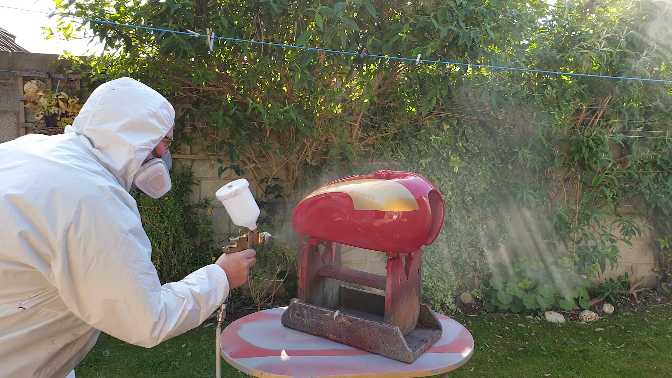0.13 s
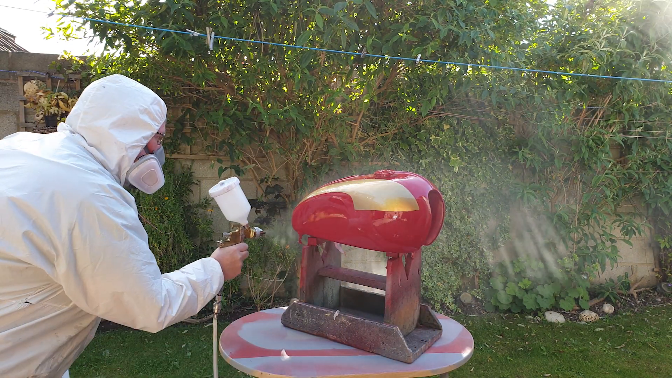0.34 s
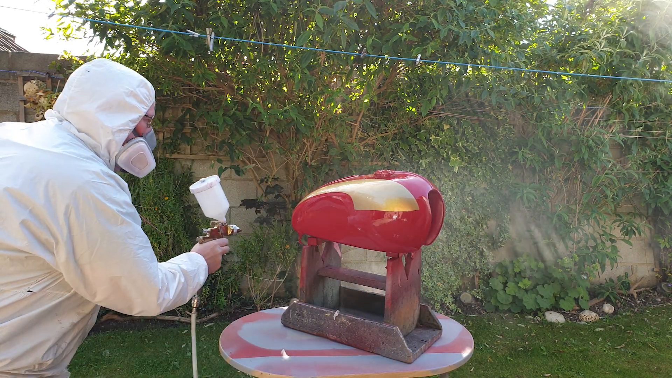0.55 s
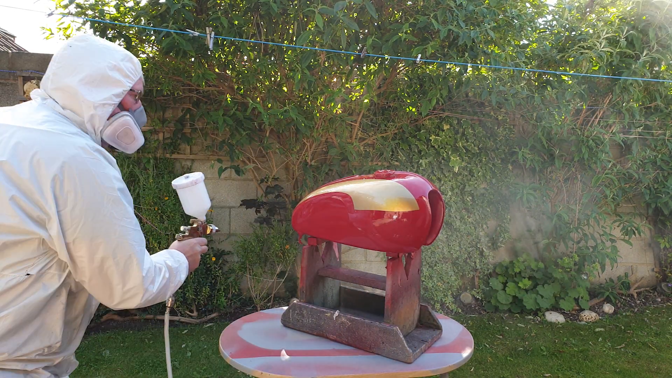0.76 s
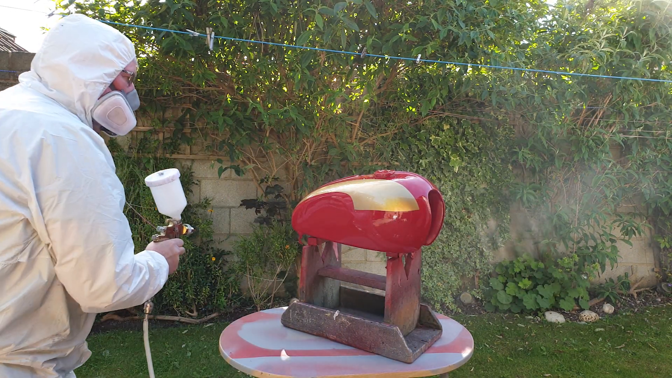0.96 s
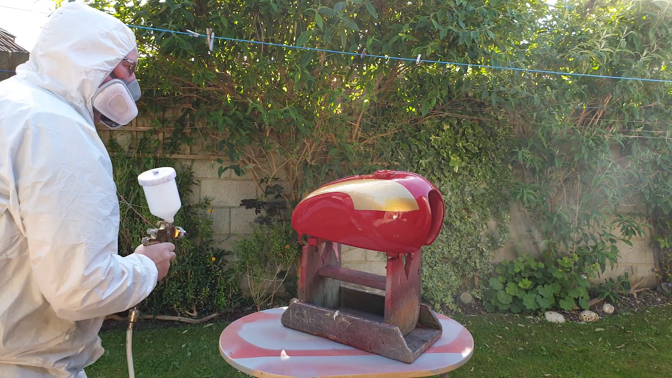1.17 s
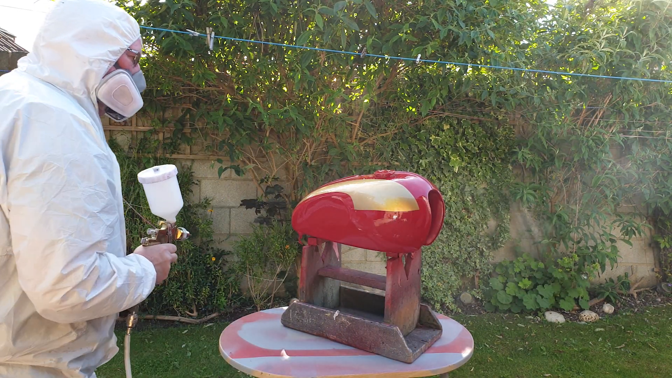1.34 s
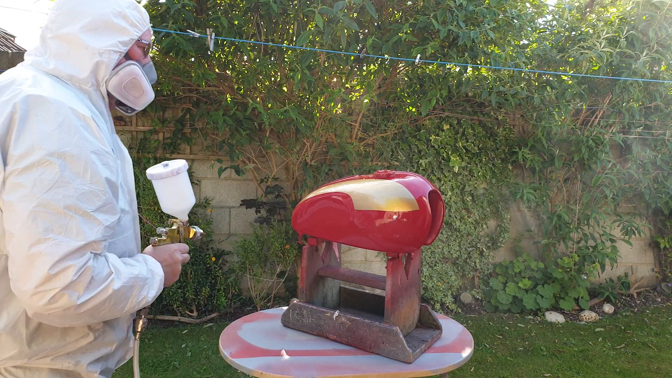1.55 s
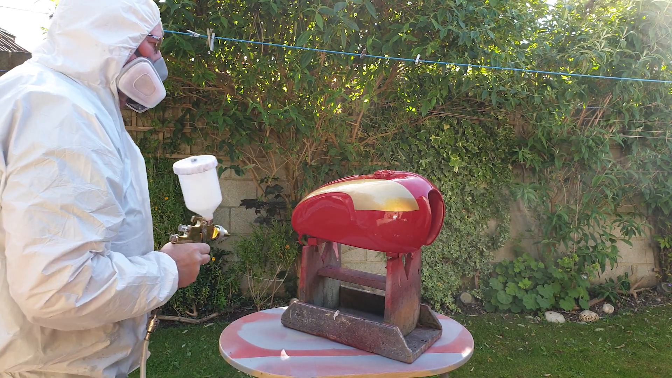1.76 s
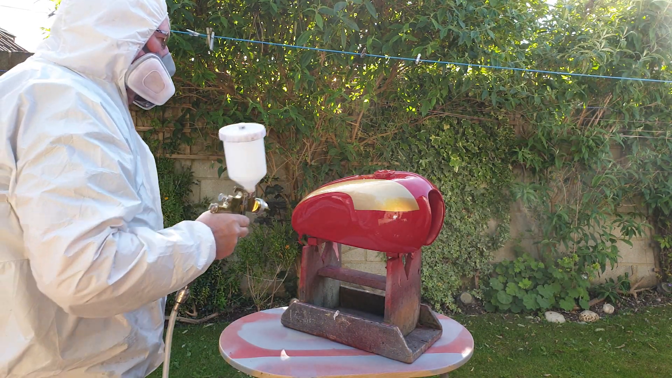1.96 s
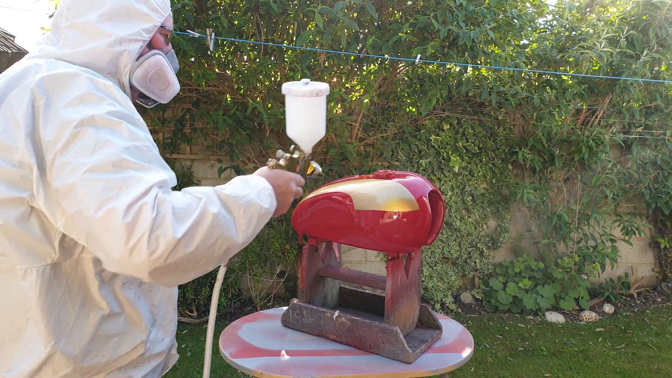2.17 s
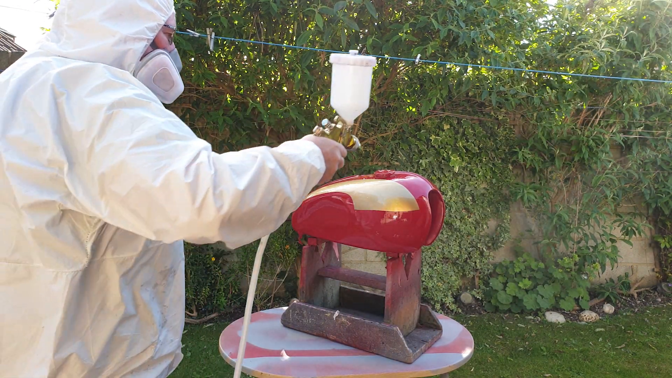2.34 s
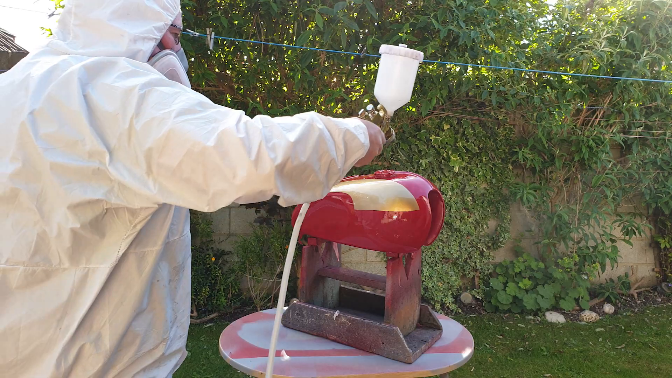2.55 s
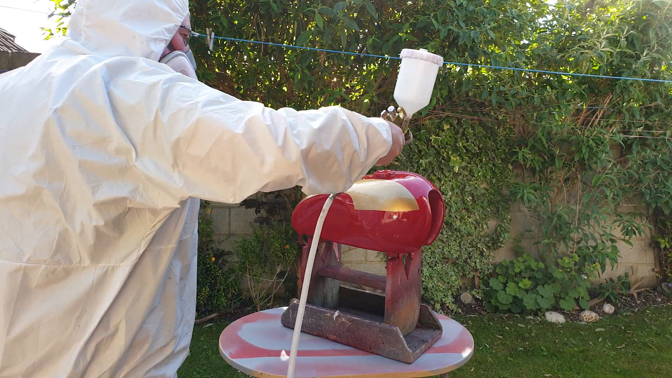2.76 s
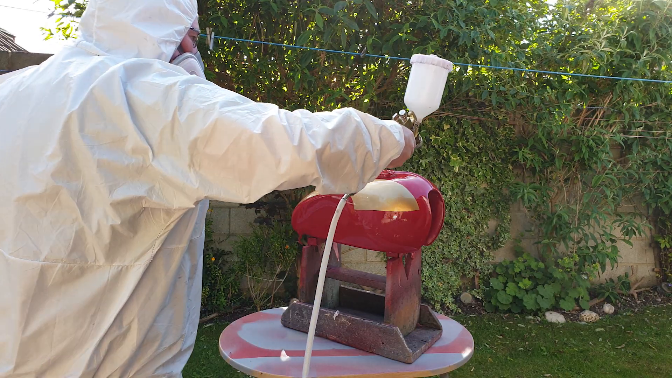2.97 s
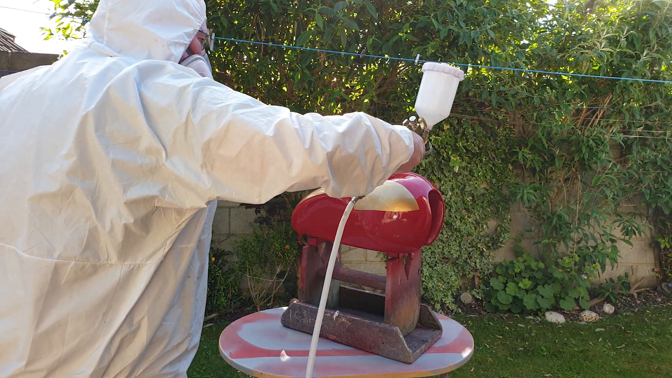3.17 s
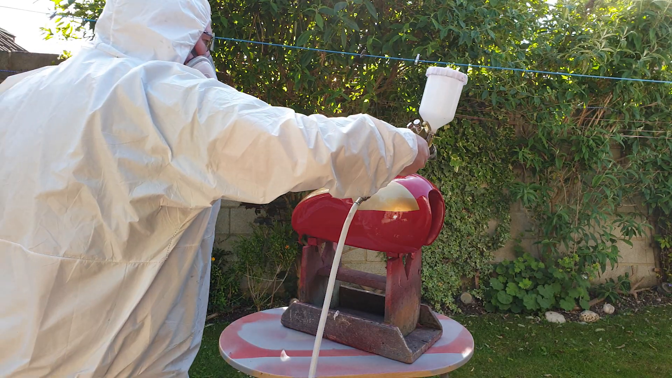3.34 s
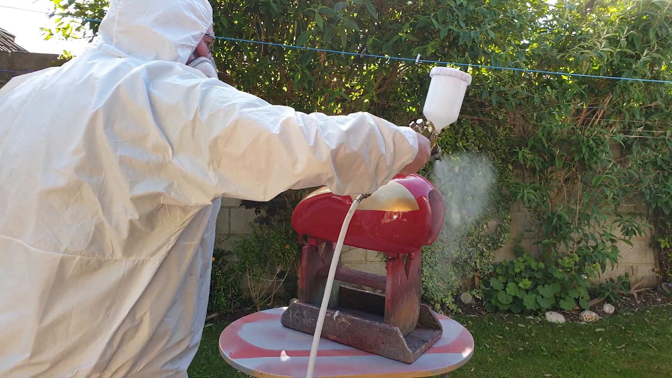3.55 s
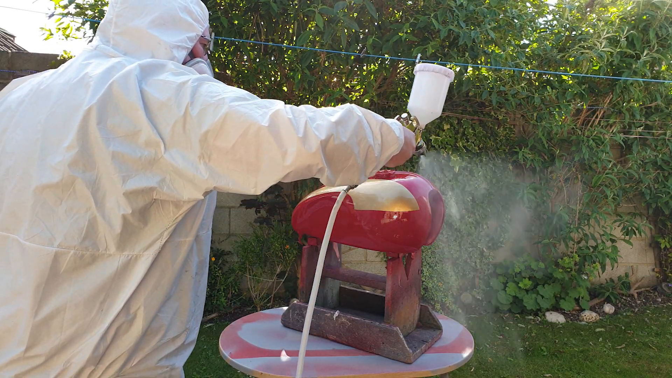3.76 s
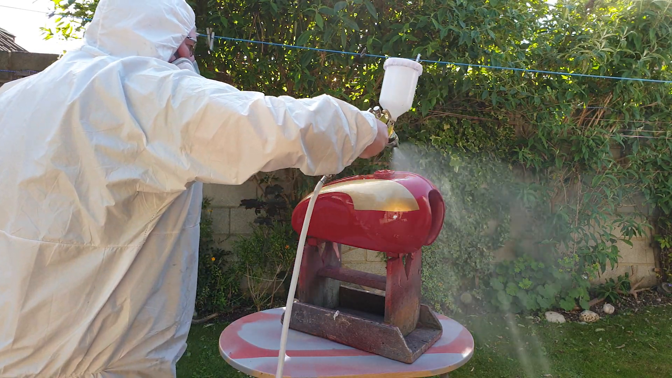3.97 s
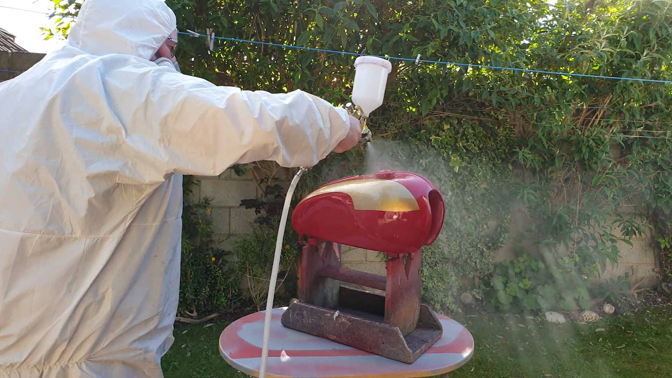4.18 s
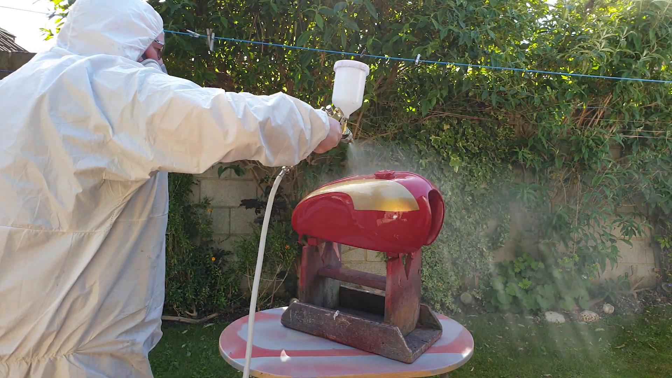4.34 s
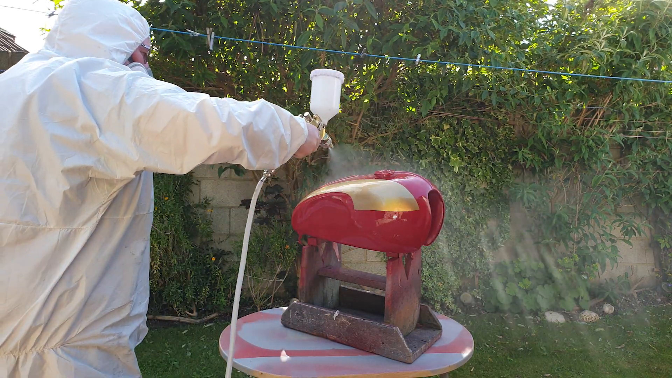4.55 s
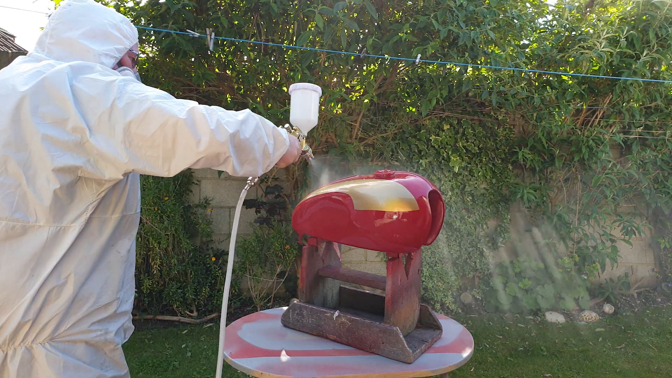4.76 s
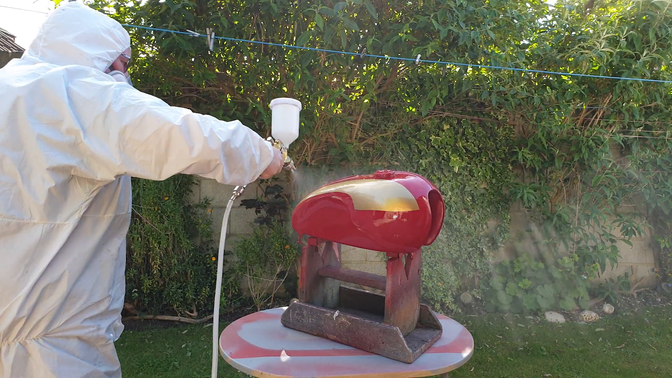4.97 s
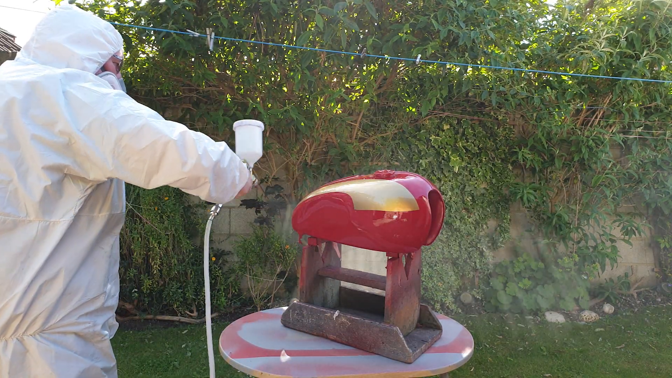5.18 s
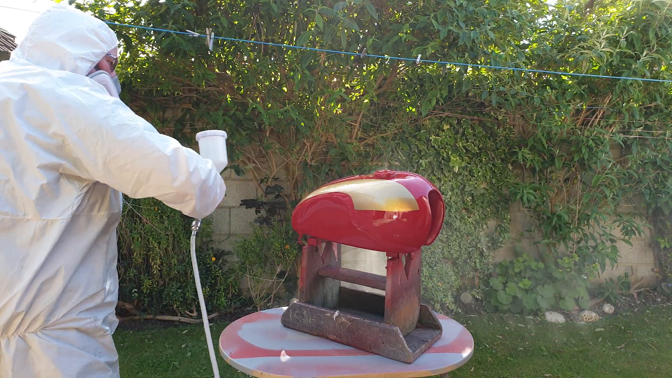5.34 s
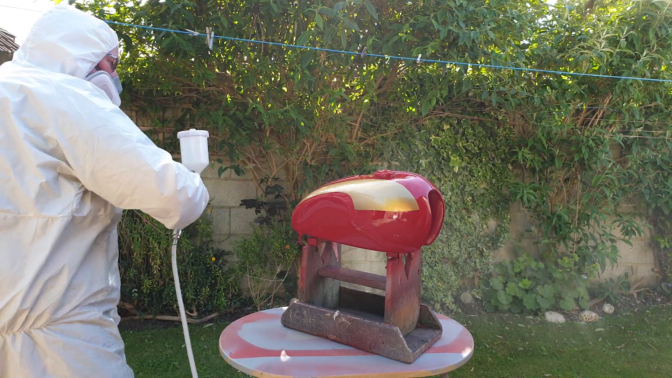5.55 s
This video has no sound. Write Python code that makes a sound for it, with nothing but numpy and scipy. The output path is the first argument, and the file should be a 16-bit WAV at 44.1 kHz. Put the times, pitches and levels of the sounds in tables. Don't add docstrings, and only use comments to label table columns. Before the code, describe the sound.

A compressed-air spray gun hisses brightly in a garden, shuts off into a faint leaking hiss, then bursts open again for a second long pass.

```python
import sys
import numpy as np
from scipy import signal
from scipy.fft import rfft, irfft, next_fast_len
from scipy.io import wavfile
from scipy.ndimage import map_coordinates

SR = 44100
rng = np.random.default_rng(int(sys.argv[2]) if len(sys.argv) > 2 else 0)


def volts(x):
    e = np.asarray(x, float) / 20
    return 10 ** e


def log_audio(samples):
    frames = np.atleast_2d(samples).T
    limited = np.clip(frames, -1, 1)
    pcm = np.round(limited * 32767).astype(np.int16)
    wavfile.write(sys.argv[1], SR, pcm)


N = 247401
T = np.arange(N) / SR

# f/Hz, density/dB per Hz
FAR_LEFT = [(30, -93), (55, -69), (90, -74.5), (115, -77), (150, -75), (220, -73.5), (310, -83.5),
            (420, -76.5), (520, -82), (700, -87.5), (1000, -89), (1400, -98), (1800, -100.5)]
FAR_RIGHT = [(30, -91), (55, -72), (90, -76.5), (115, -85.5), (150, -77), (220, -78), (310, -86),
             (420, -85), (520, -92), (700, -101.1), (1000, -103.3), (1400, -108.2), (1800, -109.9)]
# f/Hz, share/1
FAR_COMMON = [(60, 0.96), (150, 0.92), (300, 0.61), (700, 0.39), (1500, 0.039)]
# middle t/s, length/s, rise/dB
GUSTS = [
    (0.65, 0.064, 3),
    (2.25, 0.057, 3),
    (2.85, .12, 5),
    (3.7, 0.62, 7.5),
    (4.3, .1, 4),
    (4.9, 0.13, 3.5),
]
# middle t/s, length/s, rise/dB
VEHICLES = [
    (0.25, 0.34, 2.7),
    (3.1, 0.49, 4.2),
]
# f/Hz, density/dB per Hz
LEAVES_LEFT = [(900, -6), (1600, -14), (2500, -0.5), (4000, 1.5), (5200, 2.5), (7500, 4.5), (10000, -1),
               (16000, -26)]
LEAVES_RIGHT = [(900, -28), (1600, -49), (2500, -38), (4000, -53), (5200, -12), (7500, -21), (10000, -12),
                (16000, -40)]
# middle t/s, length/s, rise/dB
STIRS = [
    (1.14, 0.34, 17),
    (2.11, 0.1, 18),
    (3.5, 0.065, 7.6),
    (5.39, 0.055, 12),
    (5.62, 0.085, 27),
    (0.61, .06, 12),
]
# t/s, peak level/dB, left minus right/dB, f/Hz, sharp share/1
PUFFS = [
    (.565, -37.5, 5, 80, .1),
    (2.882, -40, -19, 60.5, .05),
    (2.99, -30.5, -29, 68, .05),
    (3.194, -31.5, -21, 62, .05),
    (3.320, -39, 2, 52, .05),
    (3.5228, -15.5, -32, 71.5, 1),
    (3.523, -33, -5.5, 194, .05),
    (3.937, -34.5, -14, 67.5, .1),
    (5.313, -32, 22, 62, 0.49),
]
# t/s, peak level/dB, f/Hz
TICKS = [
    (1.095, -47, 2600),
    (1.19, -43, 1600),
]
# f/Hz, width/Hz, level/dB, start t/s, end t/s
WHISTLES = [(4230, 71, -65.5, 0.54, 0.91), (2980, 85, -68, 0.51, 0.9), (2310, 180, -69, 2.6, 3.8),
            (3700, 70, -70, 0.6, 0.79), (3040, 250, -70, 4.9, 5.6), (5200, 1600, -63, 5.32, 5.5),
            (12150, 600, -50.5, 1.64, 2.1), (6350, 250, -62, 1.53, 1.9), (2630, 220, -69, 2, 3),
            (10900, 830, -51.5, 0.86, 1.7), (13000, 500, -58, 1.85, 2.15), (457, 130, -58.5, 2.83, 3.54)]
# t/s, bearing/degrees
BEARING = [(0.05, -6.5), (0.48, -12.5), (0.8, -21), (1.1, -13.5), (1.5, -35), (1.95, -44), (2.4, -6),
           (2.7, -4.5), (3.46, 0), (3.67, 14.5), (4.25, 8.5), (4.5, -0.5), (5.2, -10.5), (5.5, -32),
           (5.6, -11)]
# f/Hz, density/dB per Hz
LEAK_LEFT = [(1600, -108), (2250, -88), (2700, -79), (3300, -91.5), (4300, -100), (5300, -86), (6000, -80),
             (7300, -84.5), (8500, -78.5), (10500, -75), (12000, -75), (14000, -82.5), (15000, -79.5),
             (15900, -81)]
LEAK_RIGHT = [(1600, -109.6), (2700, -99), (3700, -109.0), (4800, -101.4), (6000, -86.5), (7300, -109),
              (8500, -88.5), (9500, -81), (10500, -76.5), (12000, -80.5), (13000, -80), (14000, -86),
              (15000, -95.9), (15700, -103.8)]
# f/Hz, share/1
LEAK_COMMON = [(1600, .15), (2700, 0.45), (7000, 0.19), (11000, 0.33), (15000, .15)]
# t/s, level/dB, facing the microphone/dB
LEAK_COURSE = [(0.68, -62, 3), (0.8, -58, 0), (1.05, -53, 0), (1.2, -50.5, 0.4), (1.5, -52.5, -1.5),
               (1.78, -55.5, -8), (2.08, -50, 0), (2.2, -51.5, 2), (2.4, -52, 0.2), (2.55, -52.5, 0),
               (2.7, -47.5, 4), (2.95, -48, 2.5), (3.28, -44, 6), (3.46, -47, 3), (5.43, -50.5, 5),
               (5.5, -50, 1.2), (5.6, -48.5, 2.5)]
# middle t/s, length/s, change/dB
SHADED = [
    (1.15, 0.31, -8),
    (2.35, 0.14, -1.5),
]
# f/Hz, density/dB per Hz
JET_LEFT = [(500, -83.5), (1000, -75.5), (2000, -73.5), (3500, -72.5), (5500, -70.5), (7000, -67.5),
            (8000, -60.5), (9000, -62), (10500, -61), (12000, -58.5), (13500, -60), (14500, -57.5),
            (15200, -59), (15700, -62.5)]
JET_RIGHT = [(500, -86), (1000, -83.5), (2000, -82), (3500, -80.5), (5500, -79), (7000, -79), (8000, -75),
             (9000, -66.5), (10500, -64), (12000, -61), (13500, -60), (14500, -60.5), (15200, -84),
             (15700, -86)]
# f/Hz, share/1
JET_COMMON = [(500, 0.39), (2000, 0.54), (5000, 0.56), (9000, 0.26), (15000, 0.04)]
# t/s, top level/dB
JET_TOP = [(0.12, -24.5), (0.27, -22), (0.42, -25.5), (3.67, -24.5), (4.0, -26.5), (4.2, -26), (4.5, -26),
           (4.95, -26.5), (5.12, -28)]
# opening t/s, shutting t/s
TRIGGER = [
    (-1.0, .537),
    (3.5145, 5.305),
]
# delay/ms, level/dB
ECHOES = [
    (0.699, -15),
    (1.3, -18.5),
    (2.7, -13),
    (4.702, -7),
]

PAN_DB_PER_DEG = -0.09
STEADY = np.zeros(N)


def unit_rms(x):
    return x / np.sqrt(np.mean(x ** 2) + 1e-20)


def in_time(rows):
    t, *columns = np.transpose(rows)
    return [np.interp(T, t, column) for column in columns]


def at_hz(points, hz):
    f, value = np.transpose(points)
    return np.interp(np.log(hz), np.log(f), value)


def swells(rows):
    return sum(db * np.exp(-((T - middle) / length) ** 2) for middle, length, db in rows)


def drift(rate_hz):
    r = np.exp(-80 * np.pi * rate_hz / SR)
    points = rng.standard_normal(N // 40 + 2002)
    slow = signal.lfilter([1], [1, -2 * r, r * r], points)[2000:]
    return np.interp(np.arange(N) / 40, np.arange(len(slow)), unit_rms(slow - slow.mean()))


def ring(x, hz, width_hz):
    r = np.exp(-np.pi * width_hz / SR)
    w = 2 * np.pi * hz / SR
    return signal.lfilter([0, np.sin(w)], [1, -2 * r * np.cos(w), r * r], x + 1e-18)


def sides(pan_db):
    return volts((pan_db - np.median(pan_db)) * [[0.5], [-0.5]])


def hiss(left, right, common, lag, moves, own_db, shared_db, rate):
    size = next_fast_len(N)
    hz = np.maximum(np.arange(size // 2 + 1) * SR / size, 1)
    shared, *own = rng.standard_normal((3, N))
    late = map_coordinates(shared, [np.arange(N) - lag], order=5, mode="wrap")
    share = np.clip(at_hz(common, hz), 0, 1)
    pair = np.sqrt(share) * rfft([late, shared], size) + np.sqrt(1 - share) * rfft(own, size)
    edge = hz / np.hypot(hz, left[0][0]) * np.sqrt(2)
    density_db = np.array([at_hz(left, hz), at_hz(right, hz)])
    pair = pair * volts(density_db) * np.minimum(edge, 1) ** 2
    scale = np.sqrt(np.mean(irfft(pair.mean(axis=0), size) ** 2))
    centres = [centre for centre, curve in moves]
    together = drift(rate)
    out = 0
    for k, (centre, curve_db) in enumerate(moves):
        band = np.interp(np.log(hz), np.log(centres), np.arange(len(moves)) == k)
        flicker_db = own_db * drift(rate) + shared_db * together
        gain = volts(curve_db - np.median(curve_db) + flicker_db)
        out = out + gain * irfft(pair * band, size)[:, :N]
    return out / scale


def rumble():
    passing = swells(VEHICLES)
    steep = [(4000, -125)]
    moves = [(55, swells(GUSTS)), (160, passing), (420, passing), (900, 1.63 * passing),
             (1800, -0.4 * passing)]
    noise = hiss(FAR_LEFT + steep, FAR_RIGHT + steep, FAR_COMMON, 0, moves,
                 own_db=0.46, shared_db=1.16, rate=7.9)
    return noise * volts(-52)


def leaves():
    stir, gust = swells(STIRS), swells(GUSTS)
    level_db = -61.5 + 0.28 * stir + 0.4 * gust
    low = 0.71 * stir - 0.4 * gust
    moves = [(900, STEADY), (1650, low), (2600, STEADY), (4000, STEADY), (7000, STEADY)]
    common = [(1000, 0.1), (8000, 0.11)]
    noise = hiss(LEAVES_LEFT, LEAVES_RIGHT, common, 0, moves, own_db=1.5, shared_db=-0.8, rate=7.9)
    return noise * volts(level_db)


def puffs():
    out = np.zeros((2, N))
    for start, db, pan_db, hz, sharp in PUFFS:
        t = np.clip(T - start, -0.1, 0.1)
        width_s = np.where(t < 0.006, 0.010, 0.014)
        swell = np.exp(-((t - 0.006) / width_s) ** 2)
        body = swell * np.cos(2 * np.pi * hz * t * (1 - 8.6 * t))
        crest = sharp * np.exp(-np.abs(t - 0.0015) / 0.0006)
        out += volts(db + np.minimum([[pan_db], [-pan_db]], 0)) * (body + crest)
    return out


def fittings():
    out = np.zeros(N)
    for t, db, hz in TICKS:
        click = volts(db) * (np.arange(N) == round(t * SR))
        out += ring(click, hz, width_hz=400)
    for hz, width_hz, db, start, end in WHISTLES:
        window = np.sin(np.pi * np.clip((T - start) / (end - start), 0, 1))
        once = ring(rng.standard_normal(N), hz, 0.67 * width_hz)
        tone = unit_rms(ring(once, hz, 0.67 * width_hz))
        out += volts(db + 1.2 * drift(15)) * window * tone
    return out * volts(np.array([[4], [-8]]))


def gun():
    bearing, = in_time(BEARING)
    port_gap_m, sound_m_per_s = 0.1, 343
    return bearing, port_gap_m * np.sin(np.radians(bearing)) / sound_m_per_s * SR


def leak():
    level_db, facing = in_time(LEAK_COURSE)
    bearing, lag = gun()
    shade = swells(SHADED)
    upper = -0.88 * facing
    middle = -0.14 * facing + shade
    low = 0.33 * facing + 1.4 * shade
    moves = [(1600, -0.6 * level_db), (2700, low), (4200, 0.5 * (low + middle)), (6000, middle),
             (8000, 0.35 * middle), (10200, STEADY), (12300, upper), (15000, 0.98 * upper)]
    noise = hiss(LEAK_LEFT, LEAK_RIGHT, LEAK_COMMON, lag, moves, own_db=1.3, shared_db=-0.75, rate=7.7)
    return noise * sides(0.93 * PAN_DB_PER_DEG * bearing) * volts(level_db + 4.0)


def valve_db():
    open_db_per_s, shut_db_per_s = 4200, 295
    flows = []
    for opens, shuts in TRIGGER:
        rise = np.minimum(open_db_per_s * (T - opens), 0)
        fall = shut_db_per_s * np.maximum(T - shuts, 0)
        flows.append(rise - fall)
    return np.maximum(np.max(flows, axis=0), -120)


def jet():
    top_db, = in_time(JET_TOP)
    bearing, lag = gun()
    surge_top_db, surge_body_db, surge_peak_db = 7, 3, 3.5
    since = np.where(T > 1, np.maximum(T - TRIGGER[1][0], 0), 10)
    surge = np.exp(-(since / 0.055) ** 2)
    settle_db = 3.5 * np.exp(-since / 0.08)
    pop = 7.5 * np.exp(-(since / 0.018) ** 4)
    body = 0.1813 * bearing - 0.72 * top_db + (surge_body_db - surge_top_db) * surge
    moves = [(700, body + pop), (2000, body + 0.27 * pop), (4000, body),
             (6500, 0.46 * body - surge_peak_db * surge), (8500, STEADY), (11000, STEADY),
             (13000, surge_peak_db * surge), (15000, STEADY)]
    noise = hiss(JET_LEFT, JET_RIGHT, JET_COMMON, lag, moves, own_db=0.43, shared_db=0.26, rate=5.0)
    flutter = (0.12 + 0.5 * surge) * drift(180)
    level_db = top_db + 0.01 + valve_db() + surge_top_db * surge + settle_db + flutter
    return noise * sides(PAN_DB_PER_DEG * bearing) * volts(level_db)


def echoed(x, sway):
    out = x.copy()
    treble = signal.butter(2, 3000, "high", fs=SR, output="sos")
    bright = signal.sosfilt(treble, x)
    for side in range(2):
        for ms, db in ECHOES:
            delay = ms * SR / 1000 * (1 + sway * drift(0.566))
            late = map_coordinates(bright[side], [np.arange(N) - delay], order=3, mode="wrap")
            out[side] += volts(db) * late
    return out


def scene():
    background = rumble() + leaves() + puffs() + fittings()
    return background + echoed(leak() + jet(), sway=0.1004)


def roll_off(x):
    return signal.sosfilt(signal.butter(12, 15940, fs=SR, output="sos"), x)


def record(dry):
    mix = 1.3 * np.tanh(dry / 1.3)
    return roll_off(mix)


dry = scene()
out = record(dry)
log_audio(out)
```